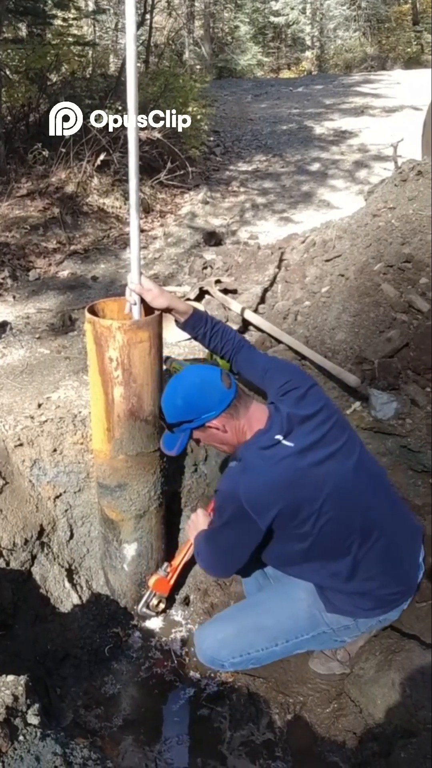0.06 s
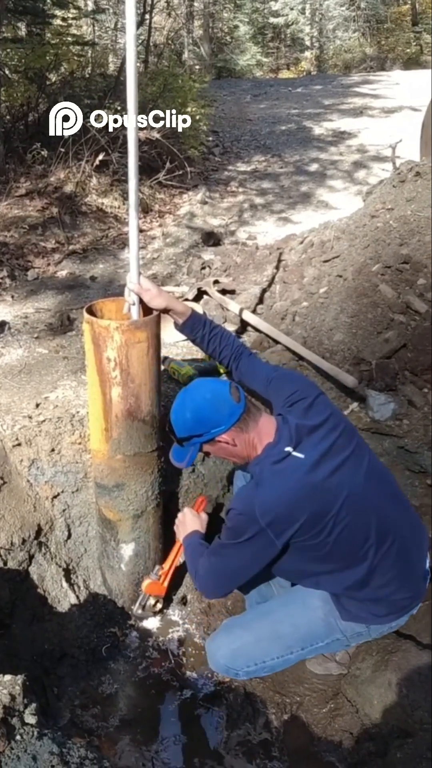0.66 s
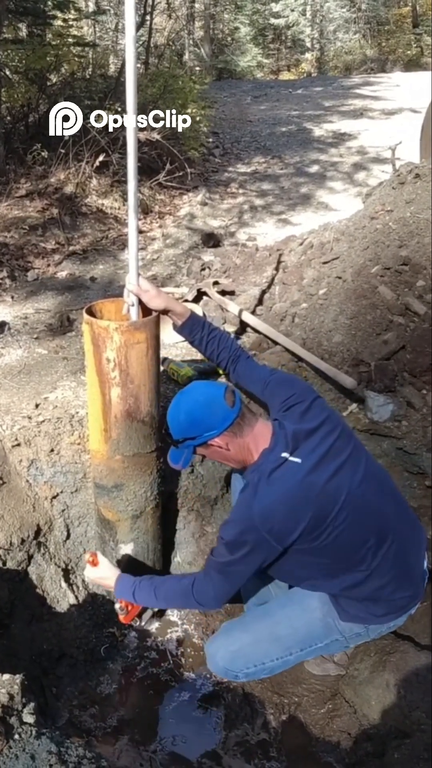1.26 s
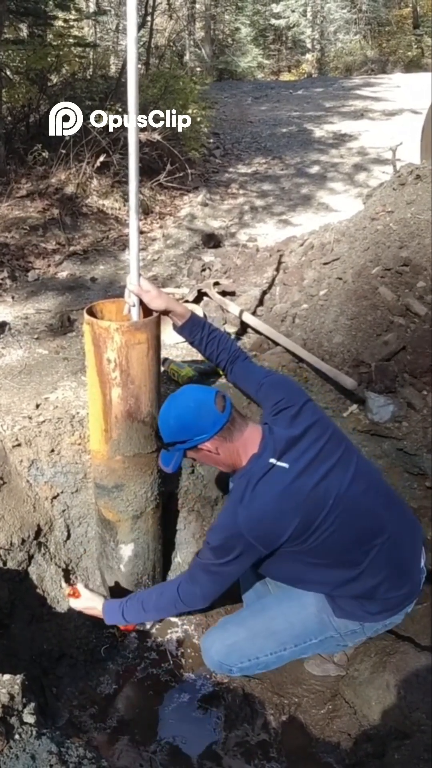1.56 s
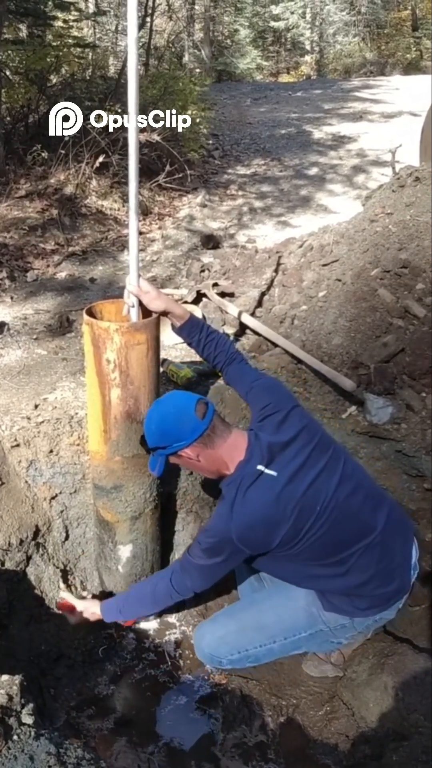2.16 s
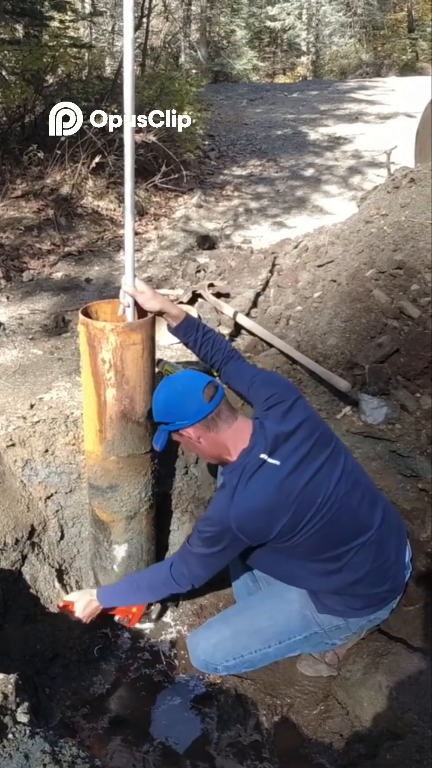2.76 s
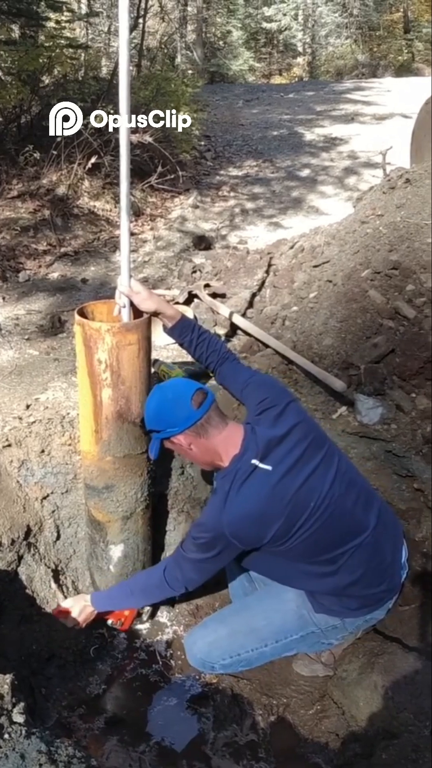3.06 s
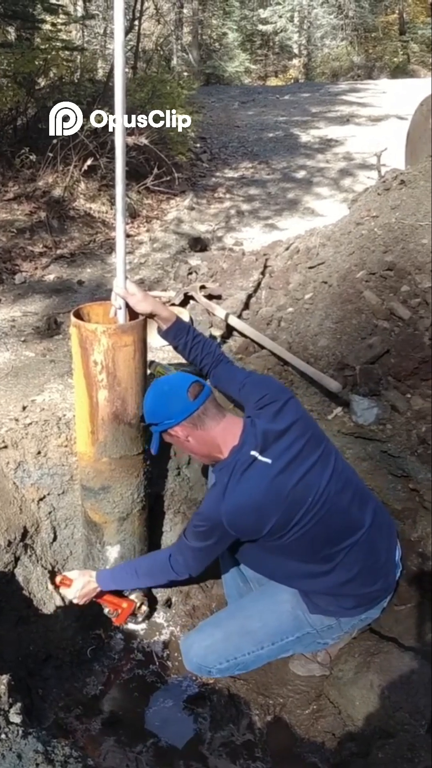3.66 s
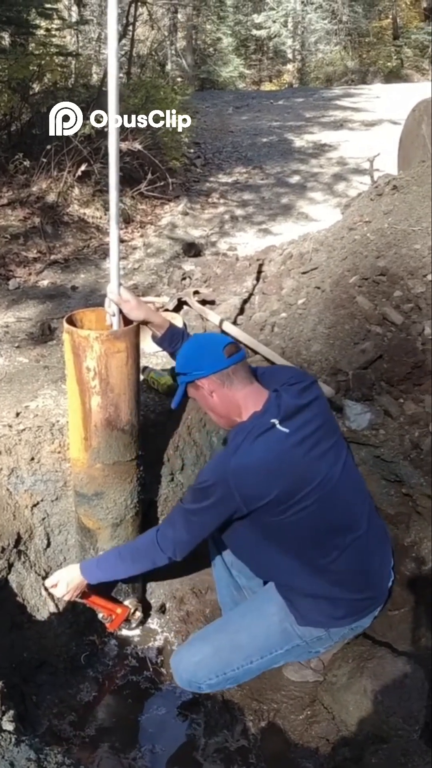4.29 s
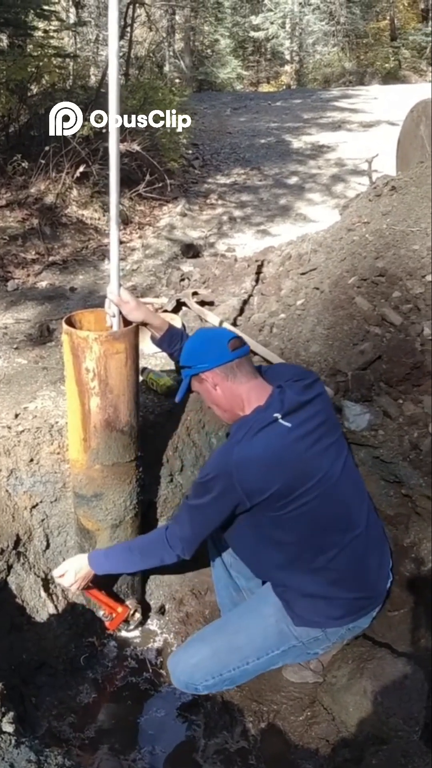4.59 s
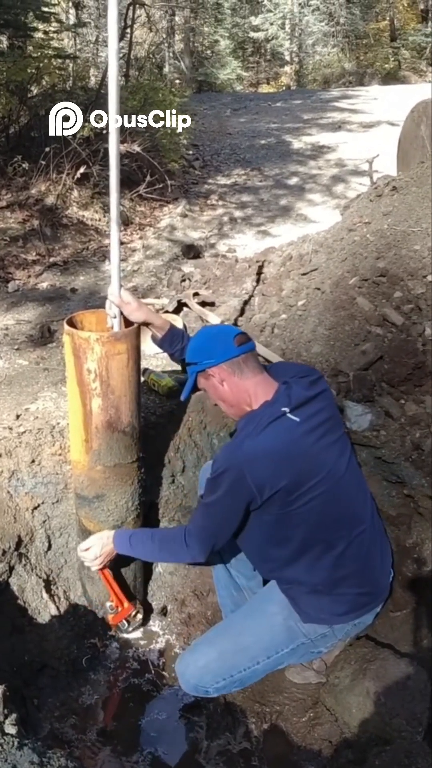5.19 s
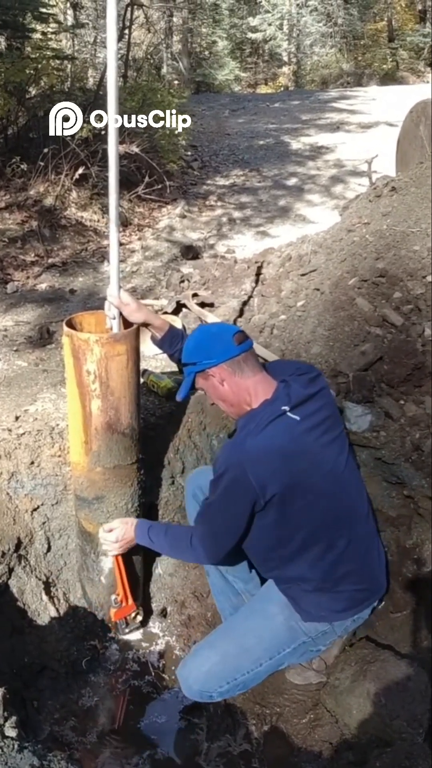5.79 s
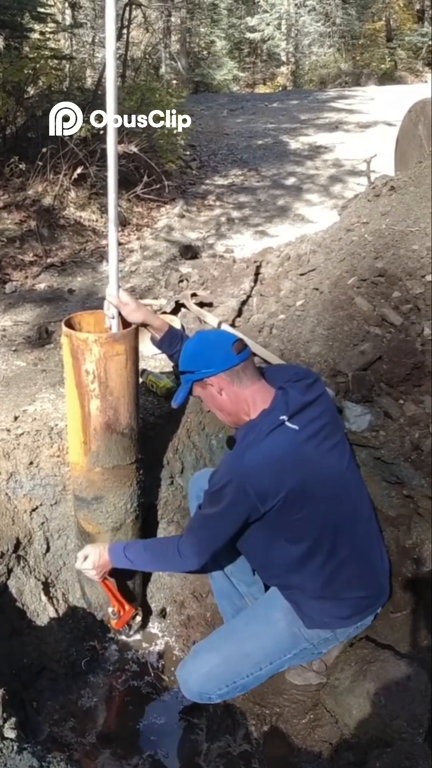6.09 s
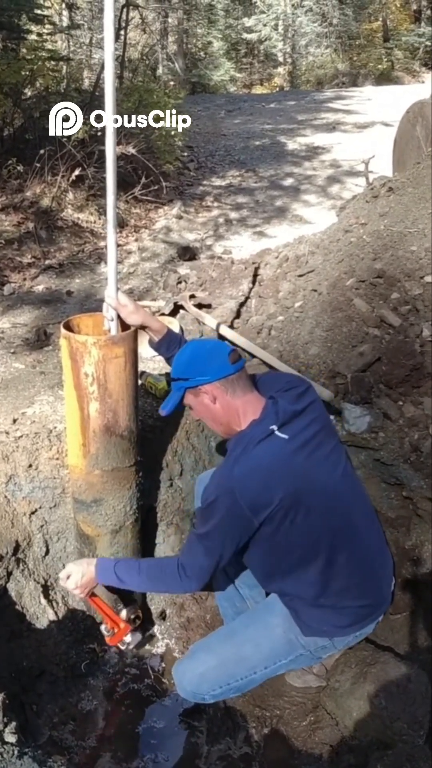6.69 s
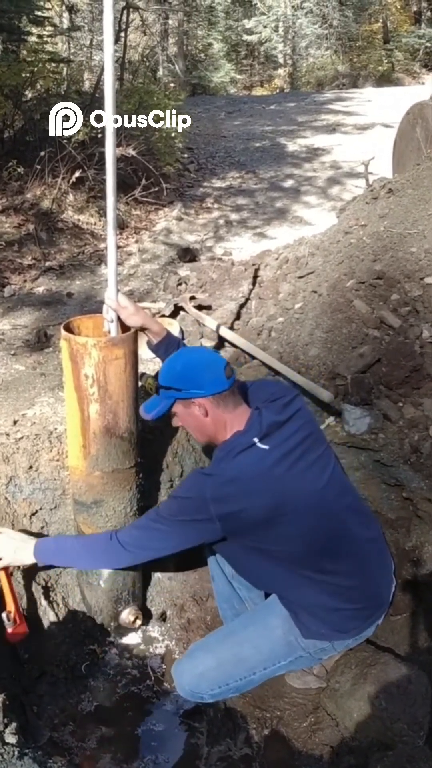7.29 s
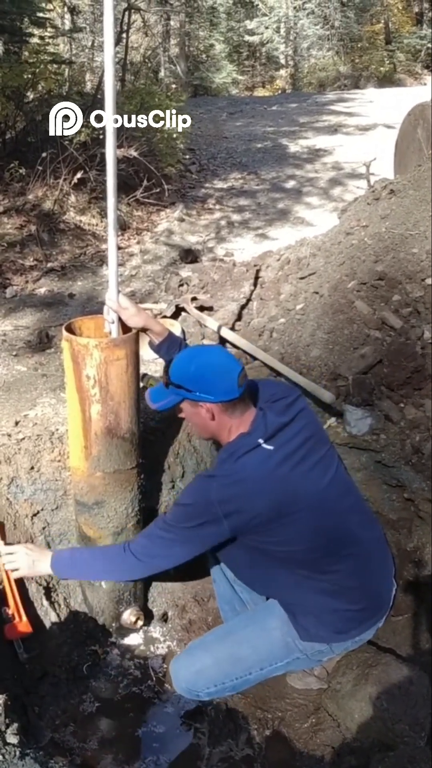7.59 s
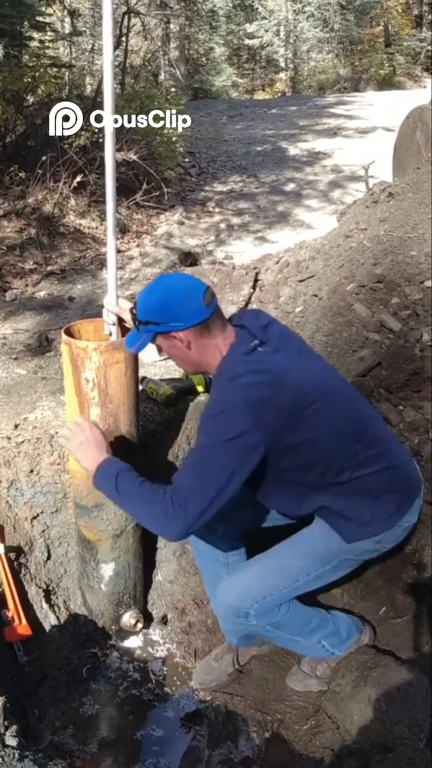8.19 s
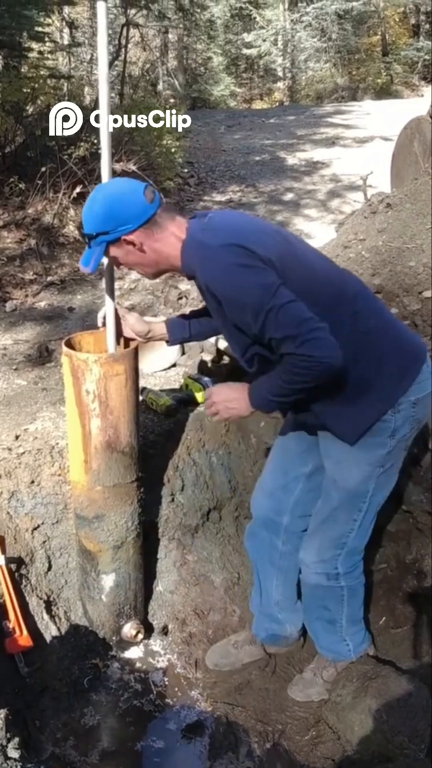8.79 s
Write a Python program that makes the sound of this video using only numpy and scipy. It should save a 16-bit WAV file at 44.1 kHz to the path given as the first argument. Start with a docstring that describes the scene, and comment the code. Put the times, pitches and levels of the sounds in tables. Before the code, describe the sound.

A pipe wrench knocks, scrapes and clinks on a steel fitting outdoors, in uneven bursts over a faint idling engine.

```python
"""A pipe wrench working a fitting at the foot of a steel well casing, outdoors, on a mono microphone.
The jaws knock, slip and bite, ringing the clamped steel and the pit around it; the threads rub and
squeak under load. Loose, the wrench clinks brightly, and it is laid aside with a last ring.
Then boots shift on gravel. Far off an engine idles in moving air, and a bird chirps near the end."""
import sys
import numpy as np
from scipy import signal
from scipy.fft import rfft, irfft
from scipy.io import wavfile
from scipy.ndimage import uniform_filter1d, minimum_filter1d

SR = 44100
rng = np.random.default_rng(int(sys.argv[2]) if len(sys.argv) > 2 else 0)


def transcribe(signal):
    """Save signal, clipped to [-1, 1], as a 16-bit WAV file at the path in sys.argv[1]."""
    frames = np.atleast_2d(signal).T
    limited = np.clip(frames, -1, 1)
    pcm = np.round(limited * 32767).astype(np.int16)
    wavfile.write(sys.argv[1], SR, pcm)


N = 390240
TIME, BLOW_TIME = np.arange(N) / SR, np.arange(SR // 2) / SR
BLOW_SIZE = np.sqrt(.02 * SR)   # turns energy 1 into rms 1 over 20 ms

# The wrench clamped on the casing. Each row: mode in Hz, relative level in dB, t60 in seconds.
CLAMPED_MODES = [(515, -10.5, 0.035), (679, -15.5, 0.13), (881, 0.5, 0.039), (994, -30, 0.16),
                 (1095, -30, .2), (1466, -0.5, 0.051), (1573, -19.5, 0.16), (1820, -29, 0.046),
                 (2377, -7.5, 0.065), (2790, -6.5, 0.062), (3000, -5.5, 0.053), (4120, -3, 0.025),
                 (4386, -4.5, 0.03), (5460, -34, 0.079), (6020, -43, 0.16), (7540, -19.5, 0.049),
                 (8870, -26, 0.036), (11320, -22.5, 0.033), (15000, -36, 0.03)]
# Short-lived resonances of the wrench, clamped and free. Each row: frequency in Hz, density in dB.
CLAMPED_COLOUR = [(150, -12), (270, -11), (400, -4), (520, -2.5), (700, 0), (900, 3), (1500, 0),
                  (2000, -2.5), (3000, -4), (4400, -17), (5200, -21.5), (10500, -32.5), (12500, -41.5),
                  (16000, -64)]
FREE_COLOUR = [(200, -18.5), (700, -12.5), (1400, -3), (2600, 0.5), (3500, -3), (4500, -2), (5500, -7),
               (9000, 2), (12000, -12.5), (13500, -21.5), (16000, -30)]
# Edges in Hz of a blow's six bands: low, body, bite, crack, tick and top.
BAND_EDGES = [150, 700, 1800, 4800, 9500, 12500, 16000]


def from_db(db):
    """Decibels to gain."""
    return 10 ** (np.asarray(db) / 20)


def rms_one(x):
    """Scale to rms 1."""
    return x / np.sqrt(np.mean(x ** 2) + 1e-20)


def energy_one(x):
    """Scale to energy 1."""
    return x / np.sqrt(np.sum(x ** 2) + 1e-20)


def dying(t, t60):
    """Decay by 60 dB every t60 seconds."""
    return from_db(-60 * t / t60)


def band(x, low_hz, high_hz, order=3):
    """Causal band-pass."""
    sos = signal.butter(order, [low_hz, min(high_hz, SR / 2 - 1)], "band", fs=SR, output="sos")
    return signal.sosfilt(sos, x + 1e-18)


def coloured(colour, size):
    """Noise with a given spectrum, rms 1."""
    hz, db = np.transpose(colour)
    log_hz = np.log(np.arange(size // 2 + 1) * SR / size + 0.0011)
    gains = from_db(np.interp(log_hz, np.log(hz), db))
    return rms_one(irfft(rfft(rng.standard_normal(size)) * gains, size))


def drift(rate_hz):
    """Random wander, spread about 1."""
    points = rng.standard_normal(int(N / SR * rate_hz) + 2)
    return np.interp(TIME * rate_hz, np.arange(len(points)), points)


def grains(per_s, spread_db):
    """Random tiny slips of uneven size."""
    sizes = from_db(spread_db * np.minimum(rng.exponential(1, N), 4)) * rng.standard_normal(N)
    return sizes * (rng.random(N) < per_s / SR)


def strokes(table, attack_s, release_t60):
    """Level of a run of movements: each builds up, holds and dies away."""
    return sum(from_db(db) * np.clip((TIME - s) / attack_s, 0, 1)
               * dying(np.clip(TIME - s - length, 0, 2), release_t60) for s, length, db in table)


def glides(table, waver, overtone_db):
    """Thin unsteady tones with a faint octave that swell, slide and fade."""
    out = np.zeros(N)
    for s, length, start_hz, end_hz, db in table:
        span = slice(max(int(s * SR), 0), int((s + length) * SR))
        along = np.clip((TIME[span] - s) / length, 0, 1)
        hz = (start_hz + (end_hz - start_hz) * along) * (1 + waver * drift(450)[span])
        phase = 2 * np.pi * np.cumsum(hz) / SR
        tone = np.sin(phase) + from_db(overtone_db) * np.sin(2 * phase)
        swell = np.sqrt(2 * np.abs(np.sin(np.pi * along)))
        out[span] += from_db(db + 3.2 * drift(55)[span]) * swell * tone
    return out


def chatter(ms, slips_db, skips_per_s=2500):
    """Contact force: a first impact, then teeth skipping ever more weakly; energy 1."""
    size = len(BLOW_TIME)
    skips = rng.choice([-1, 1], size) * (rng.random(size) < skips_per_s / SR)
    force = from_db(slips_db) * skips * np.exp(-(BLOW_TIME / (max(ms, 1) / 1000)) ** 4 / 2)
    force[0] = 1
    return energy_one(force)


def blows(table, modes, colour, balance_db, crowd_t60, modes_db, slips_db, rise_s, pivot_hz=1523):
    """Contacts ring steel modes and a crowd of damped ones; heavy blows boom, hard ones crack."""
    out, t = np.zeros(N + len(BLOW_TIME)), BLOW_TIME
    hz, db, t60 = np.transpose(modes)[:, :, None]
    seating = 1 - np.exp(-t / rise_s)   # rust and grit cushion the first instant
    lows, highs = np.array(BAND_EDGES[:-1]), np.array(BAND_EDGES[1:])
    octaves = np.log2(np.sqrt(lows * highs) / pivot_hz)
    for s, ms, level_db, weight, hardness in table:
        force = chatter(ms, slips_db)
        crowd = coloured(colour, len(t)) * dying(t, crowd_t60)
        crowd = energy_one(signal.fftconvolve(force, crowd)[:len(t)])
        swell = np.sqrt(np.cumsum(force ** 2))   # modes gather energy while the contact lasts
        phase = rng.uniform(0, 2 * np.pi, hz.shape)
        strength = from_db(rng.normal(0, 2.5, hz.shape))
        tuned_hz = hz * rng.normal(1, .002, hz.shape)   # every grip loads the steel differently
        damping = np.exp(.25 * rng.standard_normal(hz.shape))   # and chokes other modes
        rings = from_db(db) * dying(t, t60 / damping)
        steel = np.sum(rings * strength * np.sin(2 * np.pi * tuned_hz * t + phase), axis=0)
        struck = seating * (crowd + from_db(modes_db) * energy_one(steel * swell))
        tilt_db = weight * np.maximum(-octaves, 0) + hardness * np.maximum(octaves, 0)
        gains = from_db(level_db + tilt_db + balance_db)
        blow = sum(gain * energy_one(band(struck, low, high, order=5))
                   for gain, low, high in zip(gains, lows, highs))
        start = int(s * SR)
        out[start:start + len(t)] += BLOW_SIZE * blow
    return out[:N]


def afterring(x, colour, t60, tail_db, echo_s, echo_db):
    """A dense dying ring, and one scattered echo off the earth bank."""
    t = BLOW_TIME
    tail = energy_one(coloured(colour, len(t)) * dying(t, t60) * np.minimum(t / 0.0057, 1))
    echo = energy_one(rng.standard_normal(len(t)) * (t > echo_s) * dying(np.abs(t - echo_s), 0.015))
    return signal.fftconvolve(x, from_db(tail_db) * tail + from_db(echo_db) * echo)[:N]


def air(gain_db):
    """The outdoor bed: distant machine noise and moving air."""
    # Its spectrum. Each row: frequency in Hz, density in dB.
    air_colour = [(20, 15.5), (40, 14), (70, 6.5), (150, 1.5), (240, 0.5), (400, 0), (700, 2.5),
                  (1100, 0.5), (1600, -5.5), (2500, -14), (4000, -24.5), (6000, -34), (10000, -38.5),
                  (15500, -42)]
    # Its slow rise and fall. Each row: time in seconds, midrange level in dB before gain_db.
    air_levels = [(0, -58.5), (2.3, -57), (3.4, -60.5), (6.2, -58.5), (7.6, -62), (8.85, -60.5)]
    noise = coloured(air_colour, N)
    level_db = np.interp(TIME, *np.transpose(air_levels)) + gain_db
    return noise / np.std(band(noise, 300, 2000)) * from_db(level_db)


def engine(cycle_hz, wander, flutter_db):
    """A far engine idles, wavering a little; only its low orders carry to the microphone."""
    # Each row: multiple of the cycle rate, rms level in dB.
    orders = [(3, -72), (4, -60.5), (6, -62.5), (7, -68), (8, -61.5), (9, -89.5), (11, -74), (12, -71),
              (14, -74.5)]
    turn = 2 * np.pi * np.cumsum(cycle_hz * (1 + wander * drift(3))) / SR
    return sum(np.sqrt(2) * from_db(db + flutter_db * drift(1.7))
               * np.sin(order * turn + rng.uniform(0, 2 * np.pi)) for order, db in orders)


def squeaks():
    """Metal under load gives faint squeaks and a groan."""
    # Each row: start and length in seconds, first and last pitch in Hz, level in dB.
    strains = [(0, 0.7, 1405, 1378, -68), (.03, 0.43, 2364, 2150, -65.5), (.14, 0.63, 2530, 2360, -66.5),
               (3.47, 0.28, 558, 713, -60)]
    return glides(strains, waver=0.034, overtone_db=-19)


def scuffs(grit_db):
    """Clothes and boots slide on gravel with a soft, uneven, sandy swish."""
    # Each row: start and length in seconds, level in dB.
    slides = [(0, 0.1, -66.5), (3.87, 0.032, -68), (5.1, 1.36, -81), (7.46, 0.081, -69), (8.46, 0.088, -67),
              (8.655, 0.066, -64), (8.78, 0.023, -71)]
    # The swish. Each row: frequency in Hz, density in dB.
    swish_colour = [(700, 8.5), (2000, 5), (4400, 3), (5400, -11), (7500, -5.5), (9500, -11), (12000, -21),
                    (16000, -26)]
    envelope = strokes(slides, attack_s=0.016, release_t60=0.44)
    return envelope * coloured(swish_colour, N) * from_db(grit_db * drift(250))


def steel_tones(rise_s):
    """Brief single tones at the blows: short squeals, grunts and lingering rings of the steel."""
    # Each row: start in seconds, pitch in Hz, level in dB, length in milliseconds.
    brief_tones = [(0.598, 3195, -49, 8.8), (.707, 350, -43, 14), (.708, 1596, -46.5, 40),
                   (0.764, 342, -42, 13), (.795, 1514, -43.5, 16), (1.264, 820, -32, 2),
                   (1.27, 2376, -28.5, 9.5), (1.269, 5400, -50, 19), (1.333, 4100, -59, 7.7),
                   (1.755, 2780, -38, 13), (1.756, 1355, -42, 7.4), (1.786, 7520, -60, 18),
                   (1.785, 4060, -45, 11), (1.788, 5250, -54, 15), (1.985, 1920, -34.5, 8),
                   (1.989, 2780, -41, 14), (1.988, 4090, -44, 7.6), (2.114, 424, -45, 10),
                   (2.531, 2744, -27, 11.5), (2.568, 1490, -35.5, 4.8), (2.58, 6000, -54.5, 42),
                   (2.571, 11170, -45.5, 9.2), (2.633, 2740, -29.5, 11.4), (2.633, 1464, -36, 8.3),
                   (2.787, 670, -36.5, 4.3), (2.715, 1626, -46, 6), (2.715, 3000, -48.5, 8),
                   (2.789, 4100, -38, 15), (2.853, 7460, -62, 15), (2.87, 6000, -72, 37),
                   (2.998, 4200, -55, 3.4), (3.413, 2960, -48.5, 13), (3.412, 350, -42.5, 24),
                   (6.133, 890, -34.5, 7), (6.333, 533, -38, 9.2), (6.368, 245, -45.5, 10),
                   (6.332, 4470, -39.5, 7.9), (6.368, 873, -39, 14), (6.368, 1458, -39.5, 15),
                   (6.37, 543, -37, 10), (6.403, 1470, -43, 22), (6.558, 2630, -34, 9.3),
                   (6.563, 11130, -43, 7.4), (6.571, 2400, -34.5, 9.3), (6.572, 2850, -36, 3.9),
                   (7.293, 3046, -39.5, 17), (7.292, 495, -59, 20), (7.293, 903, -51.5, 9.7),
                   (7.295, 4030, -34, 7.5), (7.297, 1390, -46, 40)]
    out, t = np.zeros(N + len(BLOW_TIME)), BLOW_TIME
    for s, hz, db, ms in brief_tones:
        envelope = (1 - np.exp(-t / rise_s)) ** 2 * np.exp(-(t / (ms / 1000)) ** 2)
        tone = energy_one(envelope * np.sin(2 * np.pi * hz * t))
        start = int(s * SR)
        out[start:start + len(t)] += BLOW_SIZE * from_db(db) * tone
    return out[:N]


def casing_ring(jaws):
    """The casing and the pit around it ring on after the jaws."""
    # Each row: frequency in Hz, density in dB.
    pit_colour = [(100, -15), (300, 6), (550, 1.5), (850, 1), (1010, 7), (1200, 0), (1600, 2.5),
                  (2000, -10), (5000, -10.5), (16000, -17)]
    return afterring(jaws, pit_colour, t60=0.22, tail_db=-16.5, echo_s=0.031, echo_db=-29)


def clinks():
    """The loose wrench rattles against itself and rings brightly, with a faint tail and echo."""
    # Each row: start in seconds, chatter in milliseconds, base level in dB, then weight (bass lift)
    # and hardness (treble lift) in dB per octave.
    rattles = [(0.599, 1.7, -61, -9, 4.5), (0.674, 3.5, -71.5, 10, 3), (6.541, 10, -60, -1, -3),
               (6.558, 4.3, -40, -7, -5.5), (6.571, 4.4, -37.5, -28, -5.5), (6.591, 4.1, -51, 2.5, -4),
               (6.62, 1.3, -47, -13, 1), (6.882, 2.6, -67.5, -1, -9), (7.28, 5.2, -55, 1, -7),
               (7.2875, 3.7, -49, -2, -4), (7.293, 2, -47.5, -2, 4), (7.478, 8.1, -67, 2, -2.5),
               (7.541, 1.5, -82, 0, 2)]
    # The wrench ringing freely. Each row: mode in Hz, relative level in dB, t60 in seconds.
    free_modes = [(1295, -14, 0.27), (1490, -17, 0.25), (2000, -24.5, .12), (2440, -12, 0.17),
                  (2690, -7, 0.09), (3000, -5, 0.1), (4118, -30, 0.45), (4200, 5.5, 0.049),
                  (4480, -6.5, 0.09), (5360, -26, .2), (6940, -16.5, 0.12), (7630, -7, 0.07),
                  (9050, -23, 0.25), (11350, 3.5, 0.045), (14960, -10, .06)]
    # An average clink's six bands in dB, low to top.
    balance_db = [-13.5, 1, 8.5, -0.5, -7, -18]
    direct = blows(rattles, free_modes, FREE_COLOUR, balance_db,
                   crowd_t60=0.042, modes_db=-7.5, slips_db=-10.0, rise_s=0.0007)
    return direct + afterring(direct, FREE_COLOUR, t60=0.19, tail_db=-26.5, echo_s=0.018, echo_db=-34)


def thuds(pitch_hz):
    """Heavy shoves rock the ground for a few cycles."""
    # Each row: start in seconds, level in dB, length in seconds.
    shoves = [(0.69, -51, 0.028), (1.79, -48, 0.088), (6.323, -42, 0.04), (6.35, -55, 0.028),
              (6.406, -45.5, 0.027), (8.546, -49.5, 0.054)]
    swell = sum(from_db(db) * np.exp(-((TIME - s - length / 2) / length) ** 2 * 2)
                for s, db, length in shoves)
    return swell * rms_one(band(rng.standard_normal(N), pitch_hz / 2, pitch_hz * 2, order=2))


def scrapes(ring_t60, modes_db, dull_hz):
    """Dragging teeth send a dense run of tiny slips, dulled by rust, into the clamped steel."""
    # Drags into and out of a bite. Each row: start and length in seconds, force level in dB.
    drags = [(.692, 0.012, -52), (.725, 0.043, -50.5), (.83, 0.09, -50), (1.252, .011, -48),
             (1.3, 0.075, -52), (1.745, .01, -48), (1.774, 0.0067, -42.5), (1.968, 0.016, -44),
             (2.03, 0.078, -63), (2.59, 0.026, -47), (3.385, 0.037, -49.5), (6.126, 0.004, -45),
             (6.325, 0.065, -43)]
    t = BLOW_TIME
    steel = sum(from_db(db) * dying(t, t60) * np.sin(2 * np.pi * hz * t) for hz, db, t60 in CLAMPED_MODES)
    crowd = energy_one(coloured(CLAMPED_COLOUR, len(t)) * dying(t, ring_t60))
    body = energy_one(crowd + from_db(modes_db) * energy_one(steel))
    slips = rms_one(grains(per_s=3000, spread_db=-1.5))
    force = strokes(drags, attack_s=0.0024, release_t60=0.12) * slips
    return band(signal.fftconvolve(force, body)[:N], BAND_EDGES[0], dull_hz, order=2)


def knocks():
    """The jaws strike the fitting and the clamped steel rings briefly."""
    # Each row: start in seconds, chatter in milliseconds, base level in dB, then weight (bass lift)
    # and hardness (treble lift) in dB per octave.
    strikes = [(.706, 1.7, -50, 6.5, 10), (.7625, 3.1, -40.5, 4.5, 9), (.794, 5.2, -41.5, 4, 7.5),
               (.815, 6.7, -42, 0.5, -0.5), (.899, 7.6, -48, -1, -3.5), (.916, 18, -45.5, -3.5, -20),
               (1.264, 4.8, -41.5, 3.5, 7), (1.269, 8, -37, -26, 7.5), (1.295, 5.3, -52, -12, 4),
               (1.333, 11, -49, -1.5, -18), (1.385, 5.7, -51, 2, -4.5), (1.756, 4.3, -29, -31, -12),
               (1.7835, 2.7, -40.5, 5, 7), (1.986, 4.2, -23.5, -49, -8.5), (2.0095, 1.6, -34, -3, -3.5),
               (2.074, 26, -45, 1, -7), (2.114, 6.1, -47.5, 5.5, -6), (2.211, 20, -55.5, -2, 3),
               (2.387, 6.4, -57.5, 7, -7), (2.468, 35, -41.5, 0.5, -8), (2.532, 2.6, -31, -27, -0.5),
               (2.568, 9.6, -31, 0.5, 5.5), (2.598, 3.3, -44.5, 0, 6), (2.634, 6.5, -34, 1, 4),
               (2.715, 4.7, -51, 0.5, -2.5), (2.787, 4.1, -35, 2, -0.5), (2.852, 2.3, -29.5, -19, -4.5),
               (2.998, 3.1, -44.5, 0.5, -4), (3.005, 3.5, -42.5, 2, -8), (3.34, 5.8, -53.5, 6, -0.5),
               (3.413, 11, -51, 6, -6), (3.431, 5.6, -54.5, 8, -0.5), (6.132, 4.6, -43, 5, 5),
               (6.3325, 5.3, -37.5, 2, 5.5), (6.3675, 2.6, -42, 4.5, 11), (6.402, 3.3, -41.5, 4, 9)]
    # An average knock's six bands in dB, low to top.
    balance_db = [-5, 1, -4, -25, -37.5, -55]
    return blows(strikes, CLAMPED_MODES, CLAMPED_COLOUR, balance_db,
                 crowd_t60=0.036, modes_db=-5.0, slips_db=-5.5, rise_s=0.00024)


def threads():
    """On each pull, fine stick-slip in the threads sings faintly in the fitting."""
    # Each row: start and length in seconds, level in dB.
    pulls = [(1.48, .06, -70), (1.545, 0.095, -59.5)]
    # Resonances of the threads. Each row: centre and width in Hz, relative level in dB.
    rub_peaks = [(1410, 90, 13), (2145, 110, 11.5), (3030, 120, 5), (4290, 220, 6)]
    slips = grains(per_s=1500, spread_db=3.0)
    rub = sum(from_db(db) * rms_one(band(slips, hz - width / 2, hz + width / 2, order=2))
              for hz, width, db in rub_peaks)
    return strokes(pulls, attack_s=0.011, release_t60=0.084) * rms_one(rub)


def singing():
    """Once off the fitting, nothing damps the handle and its thin ring hangs on after a clink."""
    # Each row: start in seconds, base level in dB.
    onsets = [(6.571, -69.5), (7.294, -78)]
    # The longest-lived partials. Each row: pitch in Hz, relative level in dB, t60 in seconds.
    partials = [(1335, 0, 1.6), (1690, 3.5, 1.7), (1960, -5, 1.5), (2690, -5, 1.4), (3490, -6, 2.2)]
    out = np.zeros(N)
    for s, level_db in onsets:
        t = np.maximum(TIME - s, 0)
        for hz, db, t60 in partials:
            out += np.sqrt(2) * from_db(level_db + db) * dying(t, t60) * np.sin(2 * np.pi * hz * t)
    return out


def buzzes(spring_db, spring_t60):
    """The loose jaw rattles to rest: a gritty, bright tail with the ring of its spring inside."""
    # Each row: start and length in seconds, force level in dB, pitch of the spring in Hz.
    jolts = [(6.614, 0.007, -71, 7750), (7.298, .012, -52.5, 9130)]
    out, t = np.zeros(N), BLOW_TIME
    for s, length, db, hz in jolts:
        envelope = strokes([(s, length, db)], attack_s=.003, release_t60=.24)
        force = envelope * rms_one(grains(per_s=4100, spread_db=1.0))
        jaw = energy_one(coloured(FREE_COLOUR, len(t)) * dying(t, .015))
        spring = energy_one(dying(t, spring_t60) * np.sin(2 * np.pi * hz * t))
        out += signal.fftconvolve(force, jaw + from_db(spring_db) * spring)[:N]
    return out


def bird(trees_t60):
    """A far bird's rising chirps, blurred by trees on their way to the microphone."""
    # Each row: start and length in seconds, first and last pitch in Hz, level in dB.
    chirps = [(7.78, 0.032, 4600, 5350, -77), (7.85, 0.044, 4530, 5200, -75),
              (7.925, 0.055, 4400, 5250, -78)]
    trees = energy_one(rng.standard_normal(len(BLOW_TIME)) * dying(BLOW_TIME, trees_t60))
    return signal.fftconvolve(glides(chirps, waver=0.076, overtone_db=-27), trees)[:N]


def crunches(width, grit_db):
    """A stone under a boot grinds briefly around its own pitch, with grit spitting above and below."""
    # Each row: start and length in seconds, pitch in Hz, level in dB.
    stones = [(8.519, .008, 4200, -67), (8.683, .008, 4300, -64.5), (8.694, 0.0076, 2120, -51),
              (8.705, .012, 2900, -63), (8.721, 0.013, 3540, -60), (8.803, 0.0074, 2930, -65)]
    slips = grains(per_s=2700, spread_db=3.0)
    grit = from_db(grit_db) * rms_one(band(slips, 1200, 8000))
    out = np.zeros(N)
    for s, length, hz, db in stones:
        stone = rms_one(band(slips, hz / (1 + width), hz * (1 + width), order=2))
        out += strokes([(s, length, db)], attack_s=0.0028, release_t60=0.041) * (stone + grit)
    return out


def scene():
    """Wrench, pit and distant background at one microphone, alike in both channels."""
    jaws = knocks() + steel_tones(rise_s=0.00071) + scrapes(ring_t60=0.096, modes_db=-7.5, dull_hz=3000)
    loose = clinks() + singing() + buzzes(spring_db=-8.5, spring_t60=.06)
    rubbing = threads() + squeaks()
    ground = thuds(pitch_hz=38.0) + scuffs(grit_db=4.5) + crunches(width=0.18, grit_db=-19)
    idle = engine(cycle_hz=23.4, wander=0.00397, flutter_db=-0.05)
    background = idle + air(gain_db=2.5) + bird(trees_t60=.24)
    mono = jaws + casing_ring(jaws) + loose + rubbing + ground + background
    return np.array([mono, mono])


def limiter(x, ceiling_db):
    """The gain dips for a few milliseconds around peaks above the ceiling."""
    gain = np.minimum(1, from_db(ceiling_db) / (np.abs(x).max(axis=0) + 1e-9))
    return x * uniform_filter1d(minimum_filter1d(gain, size=177), size=177)


def record(dry):
    """The sharpest peaks are held down and the top is cut steeply at 15.8 kHz."""
    held = limiter(dry, ceiling_db=-7.0)
    return signal.sosfilt(signal.ellip(10, .2, 80, 15800, fs=SR, output="sos"), held)


dry = scene()
out = record(dry)
transcribe(out)
```